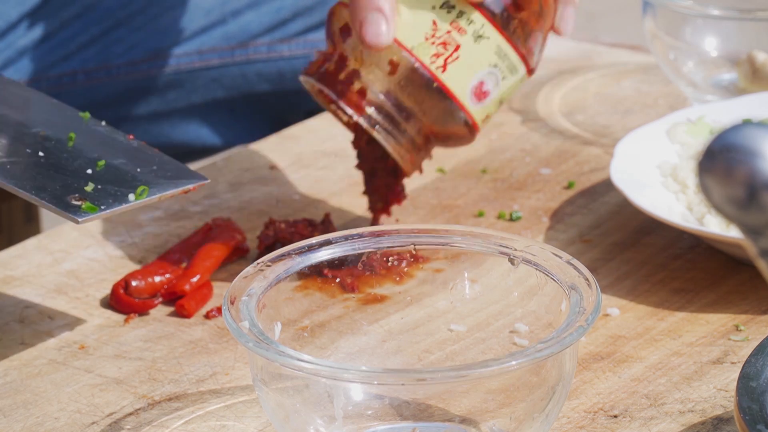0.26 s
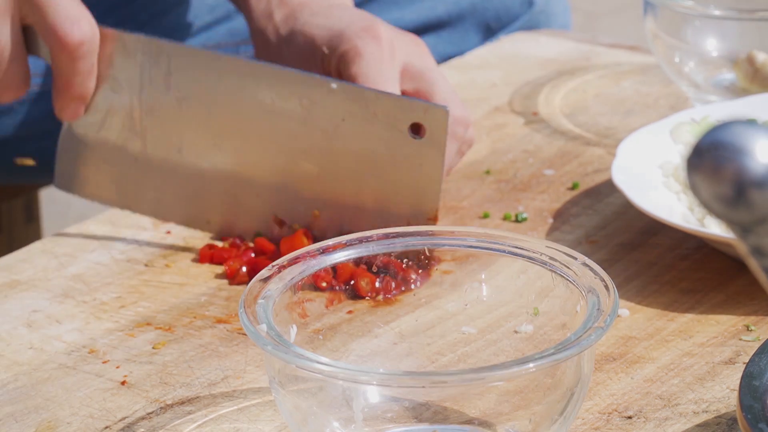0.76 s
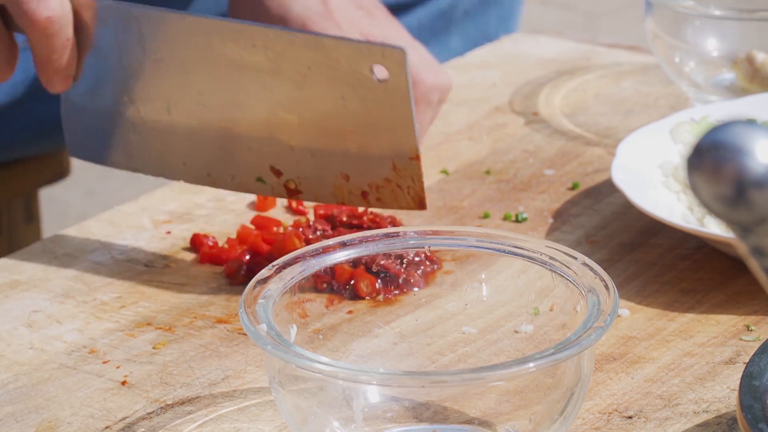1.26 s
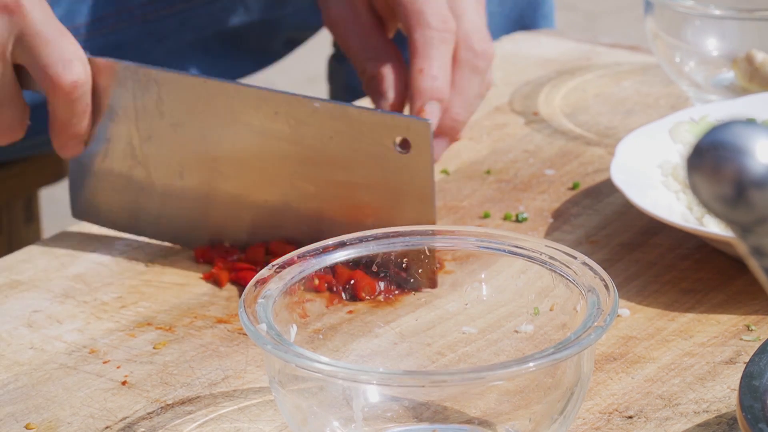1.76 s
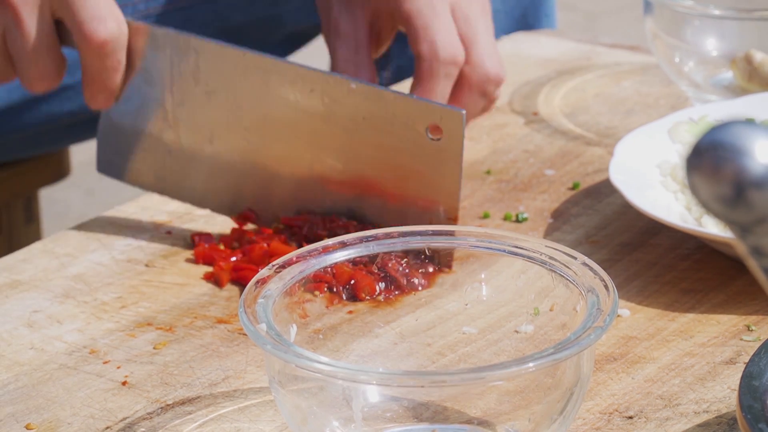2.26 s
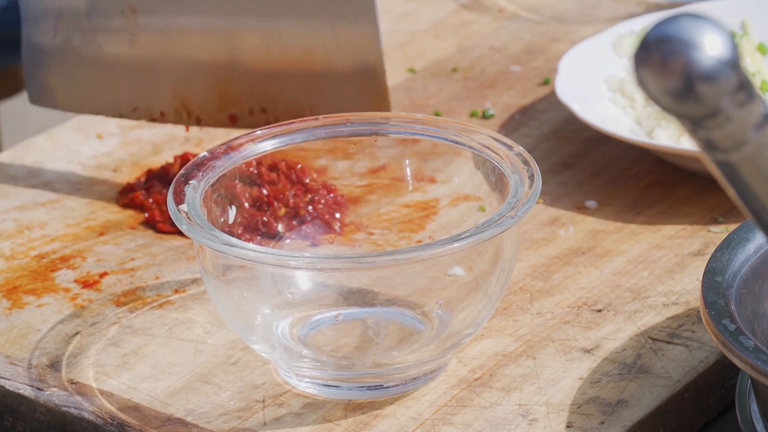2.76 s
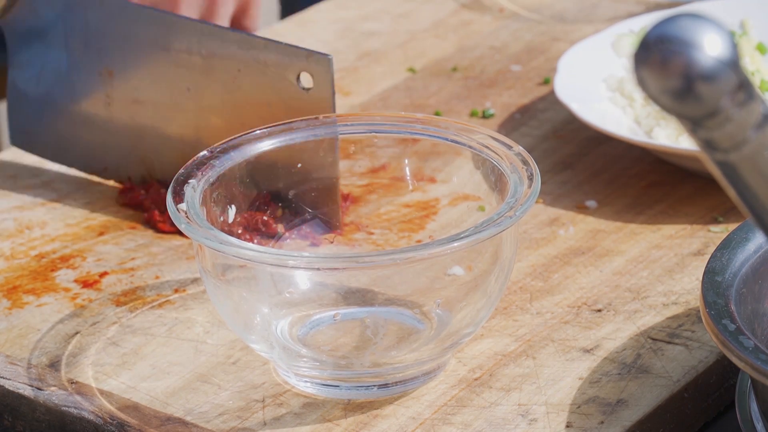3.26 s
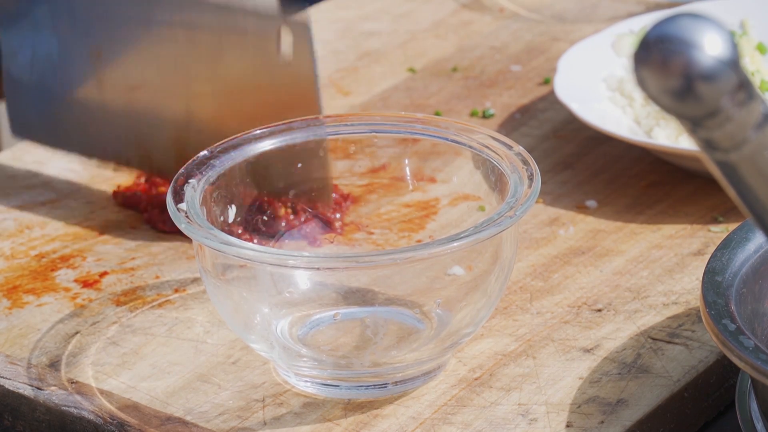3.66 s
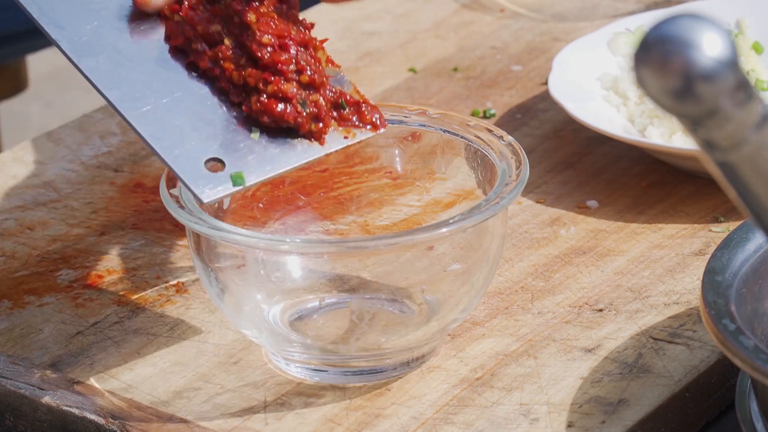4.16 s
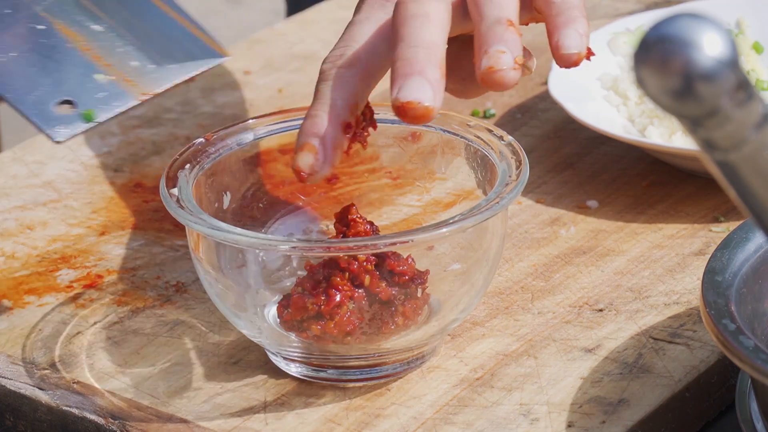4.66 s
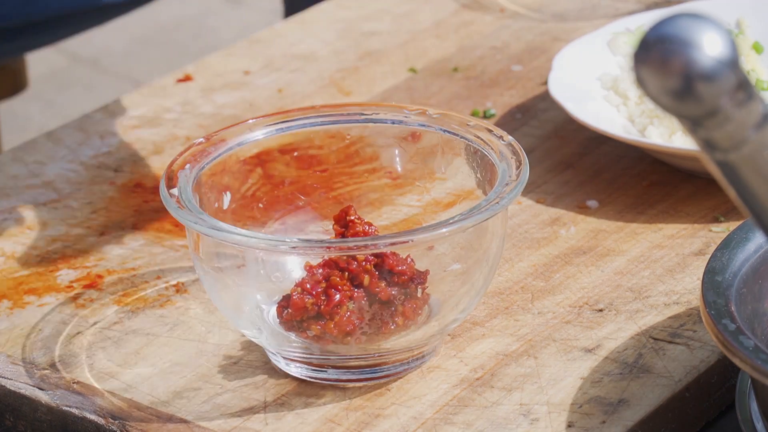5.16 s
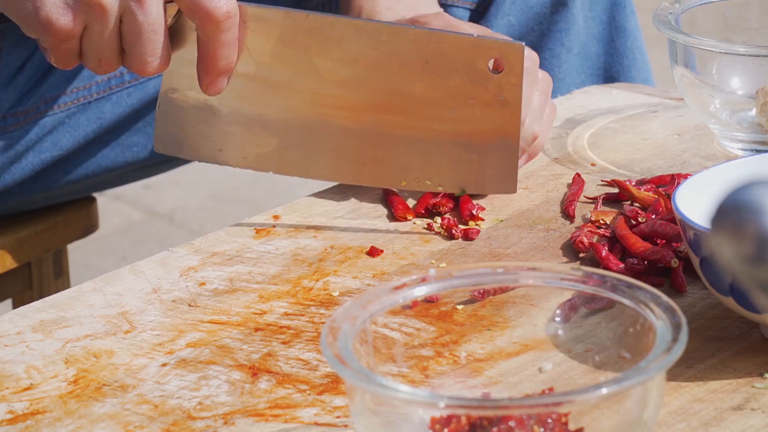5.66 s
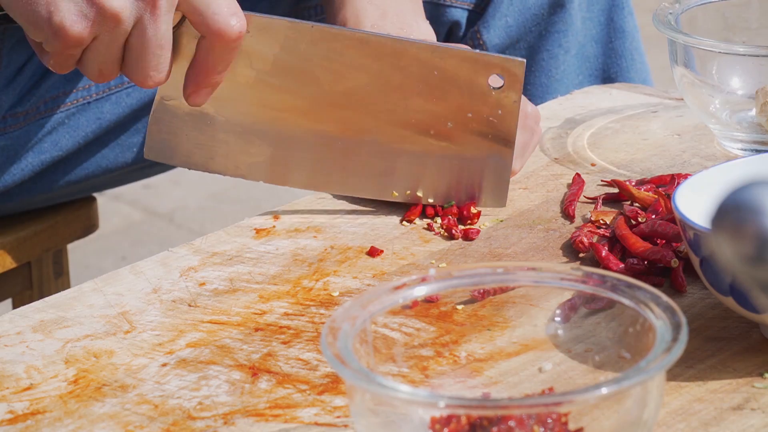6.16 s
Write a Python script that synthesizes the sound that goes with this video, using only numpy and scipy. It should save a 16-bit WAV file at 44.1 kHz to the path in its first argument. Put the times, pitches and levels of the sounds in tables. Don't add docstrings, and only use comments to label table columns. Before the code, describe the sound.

Knocking, woody cleaver chops with crisp, gritty edges and wet paste smacks run evenly on a board in a walled yard, each with a quick diffuse echo. Bowls ring faintly, and low wind thumps the close microphone, strongest just after two seconds. After one last ringing blow comes a quieter gap with soft rubbing and faint birds, then two light blade taps, a rasping metal-on-wood scrape, and a final crunch of brittle pods.

```python
import sys
import numpy as np
from scipy import signal
from scipy.fft import rfft, irfft
from scipy.io import wavfile
from scipy.ndimage import uniform_filter1d

SR = 44100
rng = np.random.default_rng(int(sys.argv[2]) if len(sys.argv) > 2 else 0)


def magnitude_from_level(level_db):
    exponent = np.asarray(level_db, float) / 20
    return 10 ** exponent


def waveform_to_disk(signal):
    frames = np.transpose(np.atleast_2d(signal))
    scaled = np.clip(frames, -1, 1) * 32767
    samples = np.round(scaled).astype(np.int16)
    wavfile.write(sys.argv[1], SR, samples)


N = 282681

# (time [s], peak [dB], edge crack [dB], yard [dB], bowls [dB])
BLOWS_NEAR = [
    (0, -20, -25, -14, -44),
    (0.188, 1.5, -50.5, -16, -40),
    (0.4005, 0.5, -52.5, -14.5, -42),
]
BLOWS_A = [(.545, -7.5, -13, 5.5, 8.5), (0.753, 3.5, -12.5, -4, 2), (0.973, 6, -28, -3.5, 3.5),
           (1.18, 3, -15, -5.5, -34), (1.401, 7.5, -15, -6, -6), (1.621, 5, -23, -5, -5),
           (1.827, 8, -33, -5.5, 2.5), (2.05, 0.5, -20, -1.5, 3), (2.262, 10, -59, -5.5, -2.5),
           (2.494, 8, -21, -6, 2)]
BLOWS_B = [(2.46, 4, -37, -0.5, 1), (2.667, 1.1, -44, -1.8, 3), (2.886, 2.3, -26, -3, 6.5),
           (3.099, 1.3, -39, -1.8, 6.5), (3.319, 4.6, -19.5, -6.5, -4), (3.532, 1.8, -23, -4, 1),
           (3.744, 3.4, -38, -1.5, 1.5), (3.945, 2.9, -21.5, -1.1, 2), (4.1551, 8.7, -32, -1.7, 21)]


def chops(rows, board, bite_db, walls):
    # (frequency [Hz], level [dB], T60 [s])
    bowl_modes = [(1261, -48, 0.6), (1405, -34, 0.13), (1560, -53, 0.39), (1613, -46, 0.8),
                  (1727, -55, 0.31)]
    drive_db, landing_s = -0.5, .0032
    spot_spread, stance_spread = .018, .07
    air_wobble_s = .00025
    s, peak_db, crack_db, yard_db, bowls_db = np.transpose(rows)
    force_db, bite_db = peak_db + drive_db, np.array(bite_db)
    contact = s + landing_s - .001
    knock = strike(contact, force_db - 5, board[:3], spread_db=1.2, contact_s=.0044)
    knock += strike(contact, force_db - 5 + bite_db, board[3:], spread_db=2, contact_s=.0044)

    s = s + landing_s
    knock += burst(s, force_db + bite_db - 19.5, [1100, 2800], t60=0.036)
    knock += burst(s, force_db + bite_db - 17.5, [600, 1150], t60=0.078)
    knock += burst(s, force_db + bite_db - 44, [2000, 4500], t60=0.0047)
    knock = cut(knock, 215, "high", order=5)

    edge = burst(s, crack_db - 7, [3000, 15000], t60=0.012)
    edge += burst(s, crack_db - 9, [2500, 15000], t60=0.012, ahead=True)
    edge += burst(s, peak_db - 25.5, [500, 2500], t60=0.015, ahead=True)

    t = np.arange(N) / SR
    blow = np.clip(np.searchsorted(s - .02, t) - 1, 0, None)
    knock = stretch(knock, s, blow, spot_spread * rng.uniform(-0.39, 1, len(s)))
    send = magnitude_from_level(yard_db[blow]) * (knock + 0.79 * cut(edge, 6000, "low"))

    facing = rng.uniform(-0.93, 1, len(s))[blow]
    echo = signal.fftconvolve(send * np.cos(facing), walls[0])[:N]
    echo += signal.fftconvolve(send * np.sin(facing), walls[1])[:N]
    blow = np.clip(np.searchsorted(s, t) - 1, 0, None)
    echo = stretch(echo, s, blow, -stance_spread * rng.random(len(s)), air_wobble_s * drift(13.8))
    return knock + edge + echo + strike(s, peak_db + bowls_db + 9, bowl_modes, spread_db=2.0)


def shearing():
    # (start [s], length [s], level [dB])
    shears = [(0.186, 0.0072, -38), (0.387, .01, -45), (0.749, 0.0098, -34), (0.964, .014, -44),
              (1.178, 0.011, -29.5), (1.398, 0.0047, -24), (1.617, 0.0089, -32), (1.821, 0.014, -40),
              (2.029, 0.024, -37.5), (2.247, 0.024, -43.5), (2.486, 0.0075, -45), (2.663, 0.0081, -46),
              (2.874, 0.011, -39.5), (3.095, 0.0085, -48), (3.31, .012, -42.5), (3.523, 0.017, -41),
              (3.733, 0.02, -38.5), (3.937, .012, -43), (4.141, 0.017, -43.5)]
    gate = np.zeros(N)
    for s, length, db in shears:
        gate[int(s * SR):int((s + length) * SR)] = magnitude_from_level(db)
    grain = rng.standard_normal(N) * magnitude_from_level(2.5 * np.minimum(rng.exponential(1, N), 4))
    return uniform_filter1d(gate, size=40) * rms_one(cut(grain, [3500, 14500], "band"))


def yard():
    # (frequency [Hz], T60 [s])
    decay = [(150, 0.71), (400, 0.22), (1040, 0.32), (2760, 0.29), (7280, 0.41), (15000, 0.24)]
    # (frequency [Hz], level [dB])
    wall_return = [(150, -25), (200, -27), (250, 0), (450, -6), (1000, -3), (2000, -5), (4000, -9.5),
                   (8000, -12), (15000, -54)]
    # (delay [s], spread [s], level over the diffuse return [dB])
    big_walls = [
        (0.045, 0.0032, 2.5),
        (0.053, 0.005, 2),
    ]
    t = np.arange(SR) / SR
    edges, out = 170 * 2 ** np.arange(0, 6.6, .25), 0
    for low, high in zip(edges, edges[1:]):
        hz = np.sqrt(low * high)
        band = cut(rng.standard_normal(SR), [low, high], "band")
        power = uniform_filter1d(band ** 2, size=int(2 * SR / hz))
        band *= band.std() / np.sqrt(power + .3 * band.var())
        out = out + band * magnitude_from_level(at_hz(wall_return, hz) - 60 * t / at_hz(decay, hz))
    out *= magnitude_from_level(-29.5) * (1.46 + np.clip(t / 0.22, 0, 1) ** 0.5) * (t > .003)
    return out * magnitude_from_level(sum(db * np.exp(-((t - lag) / spread) ** 2) for lag, spread, db in big_walls))


def blade():
    # (time [s], peak [dB], brightness [dB])
    catches = [(5.328, -27.5, 7), (5.376, -24, -12), (5.408, -22, -6), (5.461, -1, -16), (5.474, -12, -10),
               (5.491, -6, -8), (5.51, -8, -10)]
    # (frequency [Hz], level [dB], T60 [s])
    modes = [(255, -2, 0.12), (680, 3.5, 0.03), (835, 2.5, 0.039), (1305, 5.5, 0.029), (1770, -3, 0.054),
             (2170, -10, 0.049), (2920, -49, 0.014), (3460, -5, 0.06), (4210, -15, 0.036),
             (4600, -12, 0.083), (5300, -8, 0.014), (6650, -25, 0.058), (7450, -7, 0.034),
             (8800, -3, 0.076), (10100, -40, 0.1), (13000, -15, .06), (13500, -25, .06)]
    # (time [s], peak [dB])
    laid = [
        (5.172, -19.5),
        (5.2634, -13.5),
    ]
    # (frequency [Hz], level [dB], T60 [s])
    heel = [(244, -1, .08), (780, -3, .035), (1227, -6, .04), (1357, 2, .03), (1798, -6, .04),
            (2200, -11, .03), (2800, -14, .02), (3370, -20, .05), (4100, -12, .03), (5222, -13, .035),
            (6718, -16, .04), (7500, -19, .03), (8489, -19, .07), (13100, -26, .04)]
    tip = [(230, 0, .1), (750, -1, .035), (1319, 0, .045), (1900, -4, .035), (2300, -9, .025),
           (2810, -11, .04), (3510, -17, .04), (4150, -13, .03), (4635, -14, .05), (5249, -11, .03),
           (6783, -18, .04), (7500, -18, .03), (8538, -22, .07), (13100, -26, .04)]
    # (time [s], level [dB], brightness [dB])
    scrape = [(5.3, -93.5, 48), (5.342, -47.5, 4), (5.4, -27.5, -0.5), (5.44, -22.5, 0.5), (5.465, -19, -4),
              (5.5, -15.5, -19), (5.524, -25.5, -5.5), (5.545, -50, -17), (5.6, -68, -12)]
    # (peak time [s], half length [s], frequency [Hz], level [dB])
    singing = [(5.324, 0.017, 1330, -37.5), (5.385, 0.016, 1020, -25.5), (5.41, 0.016, 950, -25),
               (5.39, 0.015, 8750, -35.5), (5.435, 0.019, 4680, -27), (5.44, 0.029, 9030, -31),
               (5.465, .02, 1990, -23), (5.475, 0.0069, 6800, -17), (5.46, .012, 3420, -24),
               (5.495, .015, 1510, -24.5), (5.497, .012, 6930, -28), (5.563, .01, 3170, -47)]

    s, peak_db, bright_db = np.transpose(catches)
    held = [(hz, db, .5 * t60) for hz, db, t60 in modes]
    taps = strike(s, peak_db - 16, held[1:6], spread_db=4, contact_s=0.004)
    taps += strike(s, peak_db - 21.5 + bright_db, held[6:], spread_db=5, contact_s=0.0024)
    for (at, db), end_modes in zip(laid, [heel, tip]):
        taps += strike([at], [db], end_modes, spread_db=.5, contact_s=.0035)
    at, db = np.transpose(laid)
    taps += burst(at, db - 15, [400, 2600], t60=0.12) + burst(at, db - 14, [2600, 15000], t60=0.0092)

    stroke_db, shine_db = in_time(scrape, left=-103.0)
    contacts = rng.random(N) < 8000 / SR
    grain = rng.standard_normal(N) * magnitude_from_level(1.6 * rng.exponential(1, N)) * contacts * magnitude_from_level(1.4 * drift(60))
    wander = drift(25)
    fed = [grain * magnitude_from_level(4 * np.roll(wander, 9000 * k)) for k in range(len(modes))]
    low = sum(magnitude_from_level(db) * ring(g, hz, .4 * min(t60, .05)) for g, (hz, db, t60) in zip(fed, modes[:7]))
    high = sum(magnitude_from_level(db) * ring(g, hz, 0.4 * t60) for g, (hz, db, t60) in zip(fed[7:], modes[7:]))
    body = 1.3 * rms_one(low) + 0.99 * rms_one(cut(grain, [450, 2600], "band"))
    shine = .45 * rms_one(high) + .85 * rms_one(cut(grain, [2300, 9000], "band", order=1))
    out = taps + magnitude_from_level(stroke_db) * (body + magnitude_from_level(shine_db) * shine)

    bell_t = np.arange(-4000, 4000) / SR
    for at, half, hz, db in singing:
        i = int(at * SR) - 4000
        tone = rms_one(ring(rng.standard_normal(8000), hz, .025))
        out[i:i + 8000] += magnitude_from_level(db) * np.exp(-(bell_t / half) ** 2) * tone
    return out


def pods():
    # (time [s], peak [dB], frequency [Hz])
    cracks = [(0.1905, -6.5, 2150), (0.3934, -32, 2090), (2.1782, -22.5, 2210), (4.4775, -31.5, 3700),
              (4.5456, -39, 2170), (5.8172, -30.5, 3590), (5.86, -31, 2270), (5.838, -38, 3600),
              (5.875, -33, 2200), (6.0696, -32, 3120), (6.071, -37, 2000), (6.093, -27, 1700),
              (6.094, -30, 3260), (6.107, -30, 2100), (6.222, -20, 890), (6.2235, -22.5, 1950),
              (6.237, -16, 850), (6.238, -19, 4600), (6.247, -14.5, 4100), (6.2485, -19.5, 7000),
              (6.251, -19.5, 860), (6.262, -21, 900), (6.2138, -17, 2830), (6.2385, -14, 1780),
              (6.2495, -13, 1780), (6.2547, -9, 3230), (6.2876, -25, 2840)]
    # (time [s], peak [dB], frequency [Hz])
    smacks = [(0.4943, -39, 7600), (.567, -43, 3600), (1.0324, -32, 6000), (1.3477, -31, 4700),
              (1.7558, -37, 4540), (1.8621, -38, 4590), (3.609, -35, 7000), (3.845, -33, 8000),
              (1.0156, -22.5, 6600), (1.2196, -21, 5180), (1.279, -29, 7540), (1.7966, -27, 8300),
              (1.8155, -14, 4530), (1.982, -29, 6800), (2.0398, -13.5, 5230), (2.203, -26, 4680),
              (2.3141, -14, 8300), (2.39, -21, 4900), (2.7182, -24, 4830), (2.941, -29, 7800),
              (3.3985, -34, 8040), (3.7898, -33, 4940), (3.9962, -29, 8000), (4.618, -30, 13500),
              (5.136, -37, 7600), (6.3083, -37, 5050)]
    # (peak time [s], peak [dB], rise [s], fall [s])
    rubs = [(.006, -43, 0.0049, 0.21), (.204, -36, .008, 0.11), (.336, -41, 0.0084, 0.021),
            (4.222, -46, 0.094, 0.041), (4.465, -39.5, 0.0066, 0.28), (4.62, -56, 0.033, 0.069),
            (5.822, -44, .03, .006), (5.856, -40.5, 0.092, 0.22), (6.092, -35.5, 0.015, 0.16),
            (6.218, -34, 0.041, 0.062), (6.253, -23.5, 0.052, 0.1), (6.29, -49, 0.051, 0.071),
            (5.557, -27, 0.028, 0.044), (6.405, -37, 0.16, .05)]
    # (frequency [Hz], density [dB per Hz])
    slice_spectrum = [(240, -23), (400, -0.5), (814, 0), (1010, -10), (1730, -5), (2180, -9.5), (3260, -14),
                      (6050, -17.5), (16000, -28.5)]
    # (peak time [s], peak [dB], rise [s], fall [s])
    squelch = [
        (.425, -48.5, 0.043, 0.17),
    ]
    grain = rng.standard_normal(N) * magnitude_from_level(3.6 * np.minimum(rng.exponential(1, N), 4)) * magnitude_from_level(2.3 * drift(120))
    rub = rms_one(colour(grain, slice_spectrum)) * magnitude_from_level(-5.5) * strokes(rubs)
    wet = rms_one(cut(rng.standard_normal(N), [3600, 4800], "band"))
    suck = strokes(squelch) * wet * magnitude_from_level(0.72 * drift(50))
    snapping = snaps(cracks, 0.0085, above_hz=350, tone=0.82)
    smacking = snaps(smacks, 0.018, above_hz=500, tone=0.25)
    return snapping + smacking + rub + suck


def crockery():
    # (time [s], peak [dB], extra level of the long ring [dB])
    clinks = [
        (0.626, -41, 15),
        (0.759, -26.5, 8),
        (0.806, -15, -2),
    ]
    # (frequency [Hz], level [dB], T60 [s])
    glass_modes = [(1730, -13, 0.12), (2767, -2, 0.22), (2918, -12, 0.63), (3978, 9.5, 0.058),
                   (5340, -8, .1), (5860, -3, 0.04), (7300, -16, .06), (7840, -24, .15), (8586, -13, 0.071),
                   (11030, -19, 0.08)]
    # (time [s], peak [dB])
    rattle = [
        (1.536, -15),
        (1.539, -24.5),
        (1.543, -31),
        (1.586, -33),
        (1.601, -61),
    ]
    # (frequency [Hz], level [dB], T60 [s])
    steel_modes = [(5206, -1, .25), (5308, -1, .25), (5880, 2, .09), (6126, -1, .12), (6471, -3, .15),
                   (6842, 4, .09), (7090, -1, .15), (7677, 1, .11), (8032, 1, .1), (8500, 9, .035),
                   (9921, -6, .08), (11500, -5, .07), (12680, -3, .069), (12860, -2, .099),
                   (13610, -6, .07), (14400, -4, .05)]
    glass_stop_s, steel_stop_s = .976, 1.624
    s, peak_db, long_db = np.transpose(clinks)
    glass = strike(s, peak_db - 4, glass_modes[:2] + glass_modes[3:], spread_db=1, contact_s=.0001)
    glass += strike(s, peak_db - 4 + long_db, glass_modes[2:3], spread_db=1, contact_s=.0001)

    s, peak_db = np.transpose(rattle)
    thin = [(hz, db - 18, min(t60, .3)) for hz, db, t60 in steel_modes]
    steel = strike(s, peak_db, thin, spread_db=2, contact_s=.002)
    shimmer = burst(s, peak_db, [5200, 15000], t60=0.077) + 0.5 * burst(s, peak_db, [5200, 6800], t60=0.24)
    steel += magnitude_from_level(-15) * cut(shimmer, 5700, "high", order=4)
    t = np.arange(N) / SR
    return glass * magnitude_from_level(-14 * (t > glass_stop_s)) + steel * magnitude_from_level(-9 * (t > steel_stop_s))


def wind():
    # (peak time [s], half length [s], buffet [dB], flutter over the buffet [dB])
    gusts = [(.01, 0.032, -12.5, -16.5), (0.183, 0.12, -20.5, -32), (0.337, 0.031, -15, -40),
             (0.578, 0.062, -13.5, -43), (0.74, 0.037, -24.5, -40), (1.62, 0.04, -35, -23),
             (2.071, 0.066, 0, -18.5), (2.229, 0.039, 6.5, -39), (2.376, 0.071, 6.5, -19.5),
             (2.5, 0.072, -3.5, -14.5), (2.9, 0.25, -23, -35), (3.32, 0.083, -33, -20),
             (3.454, 0.039, -23.5, -31), (4.159, 0.11, -11.5, -31), (4.51, 0.3, -17, -42),
             (4.66, 0.22, -14, -23.5), (4.967, 0.1, -9, -13.5), (5.224, 0.097, -11, -12.5),
             (5.396, 0.12, -18, -3), (5.63, 0.091, -15.5, -19.5), (5.82, 0.053, -16.5, -28.5),
             (6.002, 0.033, -22, -39), (6.13, 0.11, -28.5, -36)]
    # (frequency [Hz], density [dB per Hz])
    buffet_spectrum = [(2.9, -49.5), (5.0, 11.5), (23, 4.5), (30, -2), (70, -13.5), (91, -27.5),
                       (150, -120)]
    # (time [s], level [dB], sign)
    jolt_rows = [
        (0.6272, -43, -1),
        (2.5602, -2.5, -1),
        (5.727, -22.5, 1),
    ]
    calm_db = [-49, -38, -40.5, -34, -31.5]
    calm_flutter_db = [-48, -48, -49, -57, -48.5]
    shake_db, shake_t60_s = -32.5, 0.2
    s, half_s, buffet_db, flutter_db = np.transpose(gusts)
    buffet = rms_one(colour(rng.standard_normal(N), buffet_spectrum))
    evened = buffet / np.sqrt(uniform_filter1d(buffet ** 2, size=6000) + 0.1)
    flutter = cut(cut(rng.standard_normal(N), [50, 150], "band"), 187, "low") * magnitude_from_level(4.3 * drift(10))
    blows = BLOWS_NEAR + BLOWS_A[1:] + BLOWS_B[1:-1]
    shake = strokes([(blow[0], blow[1] + shake_db, .01, shake_t60_s / 2) for blow in blows])
    jolts = np.zeros(N)
    for at, db, sign in jolt_rows:
        before = at - np.arange(N) / SR
        jolts += np.sign(sign) * magnitude_from_level(db) * np.exp(-np.abs(before) / 0.002) * (before > 0)
    stirred = swells(s, half_s, buffet_db + flutter_db, calm_flutter_db) + shake
    return swells(s, half_s, buffet_db, calm_db) * evened + stirred * rms_one(flutter) + jolts


def rustling():
    # (peak time [s], half length [s], level [dB])
    rustles = [(0.665, 0.24, -49), (1.55, 0.47, -48.5), (2.62, 0.14, -51), (3.607, 0.065, -54),
               (3.37, .04, -58), (3.79, 0.036, -52), (3.885, 0.05, -47), (5.396, 0.36, -60),
               (6.4, 0.27, -67)]
    # (frequency [Hz], density [dB per Hz])
    hiss_spectrum = [(1470, 5.5), (2500, 4), (4700, 0), (5290, -1.5), (8240, -1), (13700, -15),
                     (16000, -13.5), (16500, -55)]
    hiss_db = [-65, -52, -62.5, -59, -56.5]
    hiss = rms_one(colour(rng.standard_normal(N), hiss_spectrum))
    return swells(*np.transpose(rustles), hiss_db) * magnitude_from_level(0.5) * hiss


def far_hum():
    # (frequency [Hz], density [dB per Hz])
    hum_spectrum = [(100, -67), (170, -19.5), (243, -9), (441, -9.5), (660, -8), (864, -13.5), (1350, -17),
                    (5650, -58.5), (6000, -72.5), (7800, -79.5), (13200, -120)]
    hum_db = [-48, -39.5, -69, -45.5, -46]
    level_db = np.take(hum_db, part_of(np.arange(N) / SR)) + 0.16 * drift(27)
    return magnitude_from_level(level_db) * rms_one(colour(rng.standard_normal(N), hum_spectrum))


def birds():
    # (start [s], end [s], from [Hz], to [Hz], level [dB])
    chirps = [(3.03, 3.083, 4940, 5900, -63), (3.16, 3.263, 4600, 4700, -57),
              (3.446, 3.52, 5700, 5700, -65), (4.554, 4.666, 7200, 7260, -63),
              (4.628, 4.78, 4200, 4320, -63), (4.716, 4.848, 5440, 5360, -65),
              (5.83, 5.913, 6400, 6600, -53)]
    out, waver = np.zeros(N), magnitude_from_level(1.3 * drift(40))
    for start, end, from_hz, to_hz, level_db in chirps:
        i, n = int(start * SR), int((end - start) * SR)
        phase = 2 * np.pi * np.cumsum(np.linspace(from_hz, to_hz, n)) / SR
        out[i:i + n] += magnitude_from_level(level_db) * np.hanning(n) * np.sin(phase)
    return out * waver


def strike(times, peak_db, modes, spread_db, contact_s=0.00024):
    touches_db = [
        -17,
        0,
        -4,
        -7,
    ]
    touch_at = np.array([0, .25, .75, 1.25])
    out, chance = np.zeros(N), rng.standard_normal((len(times), 3, len(modes), 4))
    for k, (hz, mode_db, t60) in enumerate(modes):
        clicks = np.zeros(N)
        lag = contact_s * (touch_at + 0.057 * np.abs(chance[:, 0, k]))
        at = ((np.array(times)[:, None] + lag) * SR).astype(int)
        size_db = np.array(peak_db)[:, None] + mode_db + touches_db
        size_db = size_db + spread_db * chance[:, 1, k, :1] + 2.2 * chance[:, 2, k]
        np.add.at(clicks, at, magnitude_from_level(size_db))
        out += ring(clicks, hz, t60)
    return out


def ring(clicks, hz, t60):
    r, w = magnitude_from_level(-60 / (t60 * SR)), 2 * np.pi * hz / SR
    return signal.lfilter([0, np.sin(w)], [1, -2 * r * np.cos(w), r * r], clicks + 1e-18)


def burst(times, peak_db, band_hz, t60, ahead=False):
    marks, tail = np.zeros(N), magnitude_from_level(-60 * np.arange(3000) / SR / t60)
    marks[(np.array(times) * SR).astype(int)] = magnitude_from_level(peak_db)
    if ahead:
        shape = signal.fftconvolve(marks, tail[::-1])[2999:]
    else:
        shape = signal.fftconvolve(marks, tail)[:N]
    return shape * rms_one(cut(rng.standard_normal(N), band_hz, "band"))


def snaps(rows, t60, above_hz, tone):
    out, white = np.zeros(N), rms_one(cut(rng.standard_normal(N), above_hz, "high"))
    t = np.arange(1500) / SR
    for s, peak_db, hz in rows:
        i = int(s * SR)
        sound = tone * np.sin(2 * np.pi * hz * t) + 0.23 * white[i:i + len(t)]
        out[i:i + len(t)] += magnitude_from_level(peak_db - 60 * t / t60) * sound
    return out


def stretch(x, s, blow, share, wobble_s=0):
    t = np.arange(N) / SR
    return np.interp(s[blow] + (t - s[blow]) * (1 + share[blow]) + wobble_s, t, x)


def part_of(s):
    changes = [
        0,
        .6262,
        2.5585,
        4.1587,
        5.724,
        6.41,
    ]
    return np.minimum(np.searchsorted(changes, s, "right") - 1, len(changes) - 2)


def strokes(rows):
    t = np.arange(0, N, 16) / SR
    gain = sum(magnitude_from_level(db - 30 * np.where(t < s, (s - t) / rise, (t - s) / fall)) for s, db, rise, fall in rows)
    return np.interp(np.arange(N) / SR, t, gain)


def swells(times, half_s, peak_db, calm_db):
    t = np.arange(0, N, 16) / SR
    part = part_of(t)
    power = magnitude_from_level(np.take(calm_db, part)) ** 2
    for s, half, db in zip(times, half_s, peak_db):
        power += (part == part_of(s)) * magnitude_from_level(db) ** 2 * np.exp(-2 * ((t - s) / half) ** 2)
    return np.interp(np.arange(N) / SR, t, np.sqrt(power))


def in_time(rows, left=None):
    s, *columns = np.transpose(rows)
    return [np.interp(np.arange(N) / SR, s, c, left, left) for c in columns]


def at_hz(points, hz):
    table_hz, value = np.transpose(points)
    return np.interp(np.log(hz), np.log(table_hz), value)


def colour(x, spectrum):
    hz = np.fft.rfftfreq(len(x), 1 / SR) + 1
    return irfft(rfft(x) * magnitude_from_level(at_hz(spectrum, hz)), len(x))


def cut(x, hz, kind, order=2):
    return signal.sosfilt(signal.butter(order, hz, kind, fs=SR, output="sos"), x)


def drift(rate_hz):
    return rms_one(cut(rng.standard_normal(N + SR), rate_hz, "low")[SR:])


def rms_one(x):
    return x / np.sqrt(np.mean(x ** 2) + 1e-20)


def scene():
    # (frequency [Hz], level [dB], T60 [s])
    board_near = [(236, -4, 0.075), (495, 2, 0.045), (560, -10, 0.04), (1254, -12, 0.031),
                  (1620, -10, 0.012), (2200, -19.5, 0.017), (3300, -39, 0.0053)]
    board_yard = [(242.3, -9.5, 0.095), (481.4, 1.5, 0.039), (563, -4.5, 0.055), (650, -3.5, 0.043),
                  (816, -1, 0.034), (880, -25, 0.013), (1081, -4, 0.029), (1259, -6, 0.026),
                  (1620, -10.5, 0.02), (2014, -15, 0.027), (2330, -16, 0.0093), (3350, -42, 0.0064)]
    bite_near_db = [3, -2, -0.5]
    bite_a_db = [-2.7, 0.5, 2.1, -2.7, -3.3, -0.7, -2.1, 2, 1.7, -2]
    bite_b_db = [.1, 0.5, 1.5, 3.1, 0.5, 1.5, 0.2, 1.5, -9]
    part, walls = part_of(np.arange(N) / SR), [yard(), yard()]
    chopping = (part == 0) * chops(BLOWS_NEAR, board_near, bite_near_db, walls)
    chopping += (part == 1) * chops(BLOWS_A, board_yard, bite_a_db, walls)
    chopping += (part == 2) * chops(BLOWS_B, board_yard, bite_b_db, walls)
    near = crockery() + blade()
    near += magnitude_from_level(-21.5) * signal.fftconvolve(near, walls[0])[:N]
    background = wind() + rustling() + far_hum() + birds()
    return (chopping + shearing() + near + pods() + background)[None]


def low_pass(x):
    return signal.sosfilt(signal.butter(12, 16850, fs=SR, output="sos"), x)


def record(dry):
    ceiling_db, release_db_s, grab_s = -3, 289.5, .004
    ramp = release_db_s * np.arange(N) / SR
    over_db = np.maximum(20 * np.log10(np.abs(dry[0]) + 1e-9) - ceiling_db, 0)
    held_db = np.maximum.accumulate(over_db + ramp) - ramp
    r = np.exp(-1 / (grab_s * SR))
    duck_db = signal.lfilter([1 - r], [1, -r], held_db)
    clipped = np.clip(dry * magnitude_from_level(-duck_db), -1, 1)
    return low_pass(cut(clipped, 15600, "low", order=10))


dry = scene()
out = record(dry)
waveform_to_disk(out)
```